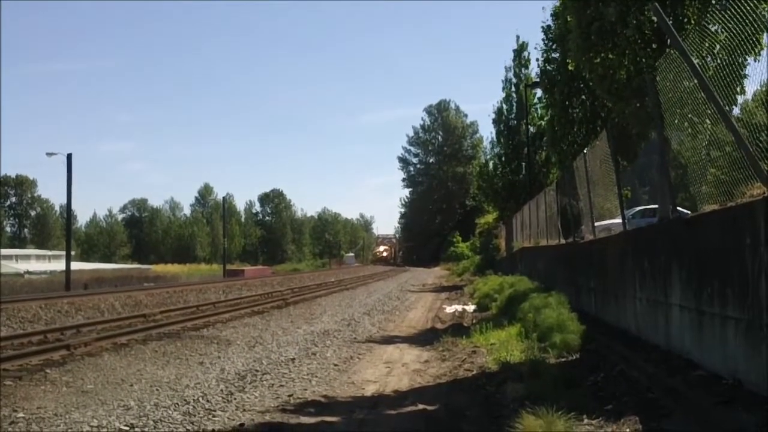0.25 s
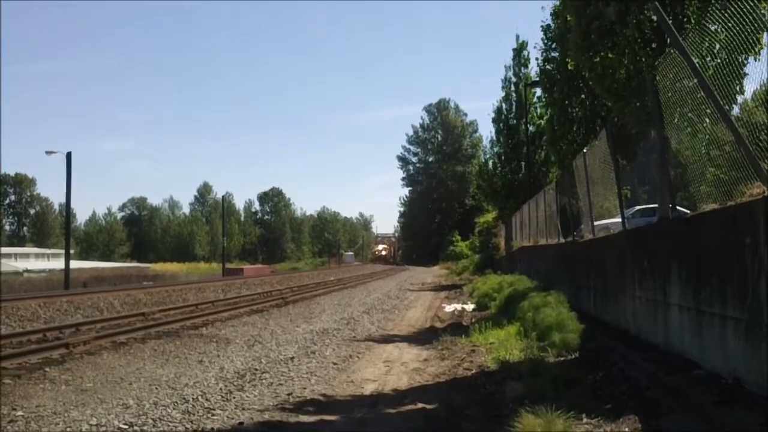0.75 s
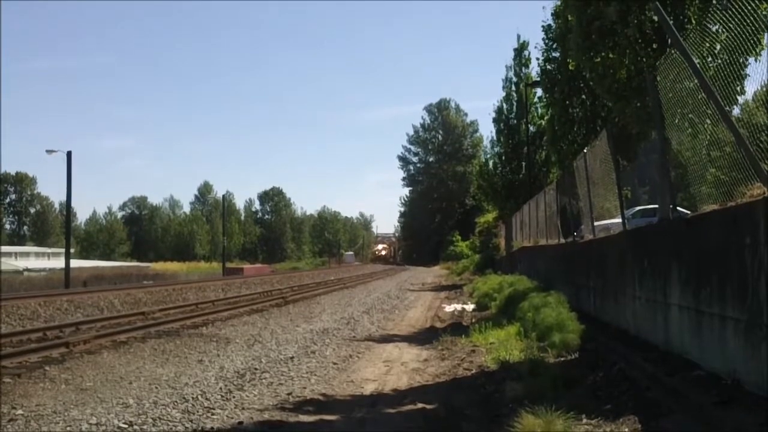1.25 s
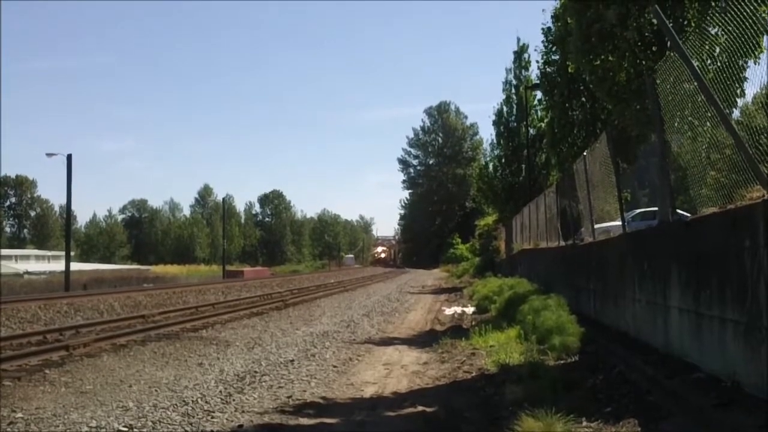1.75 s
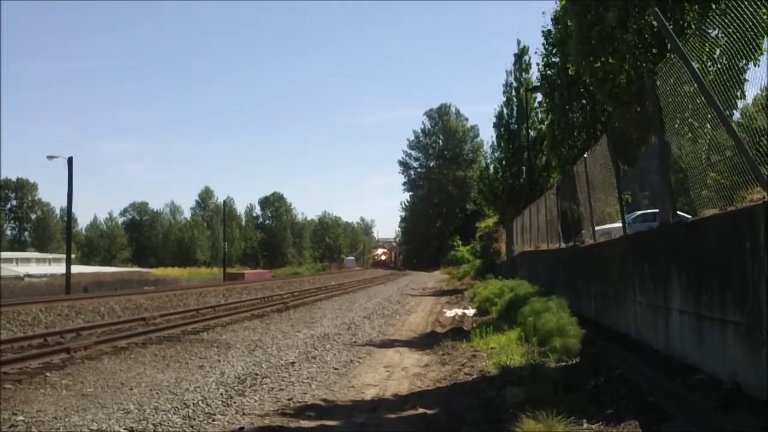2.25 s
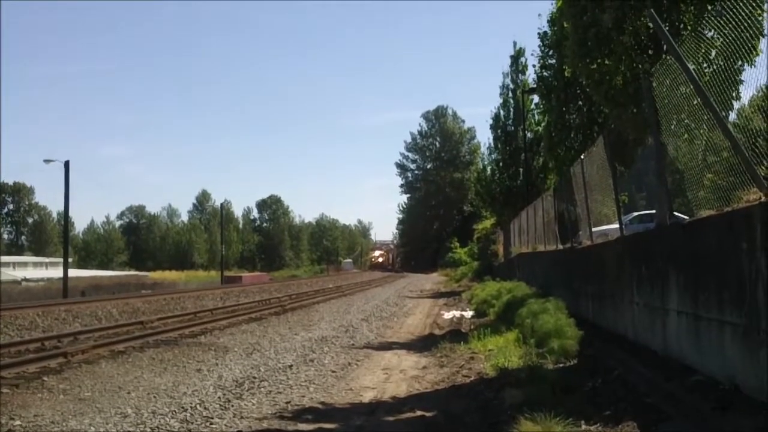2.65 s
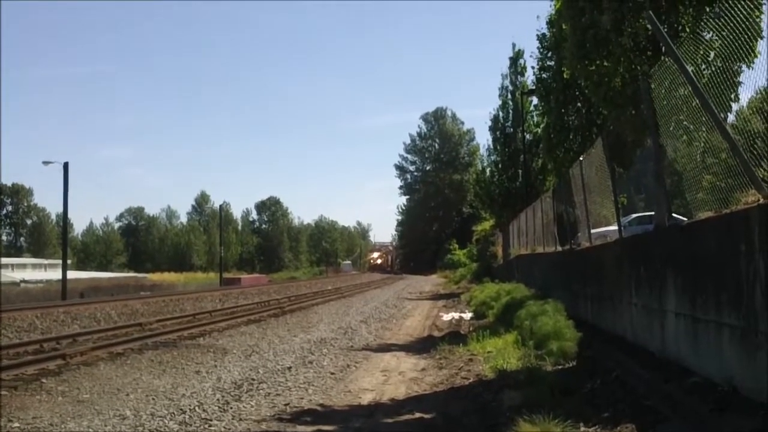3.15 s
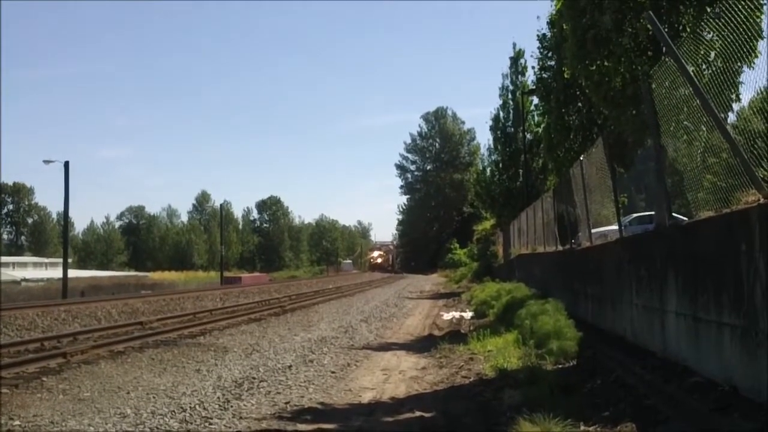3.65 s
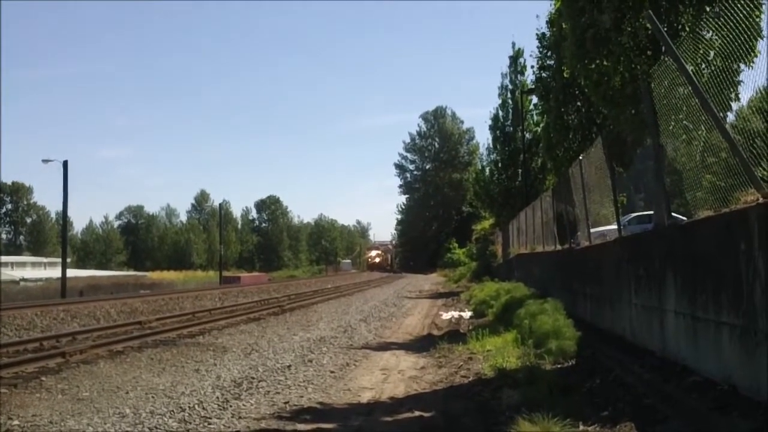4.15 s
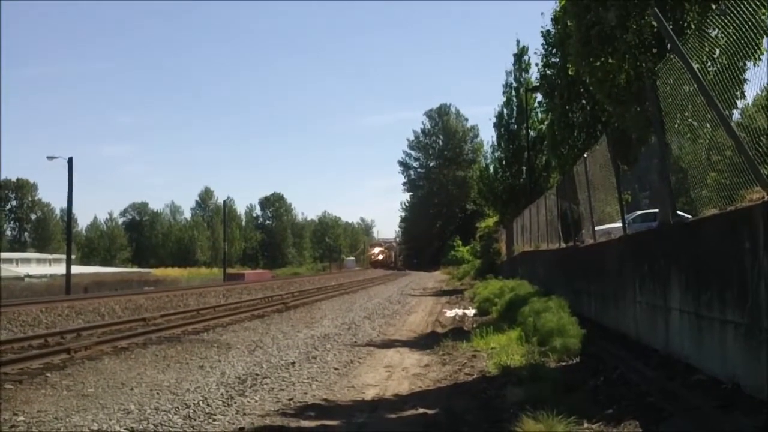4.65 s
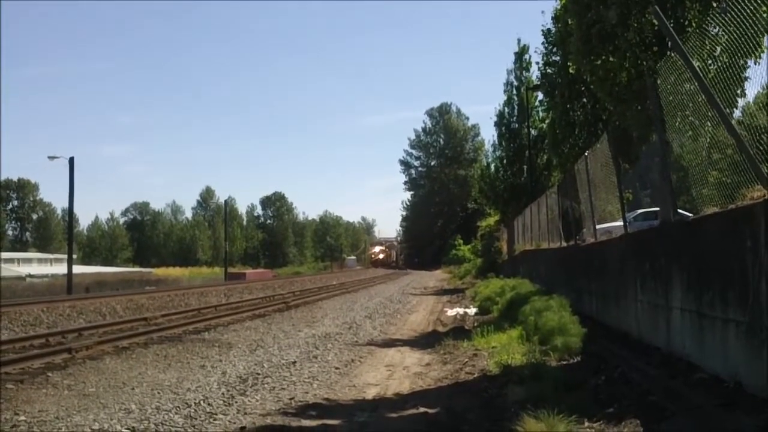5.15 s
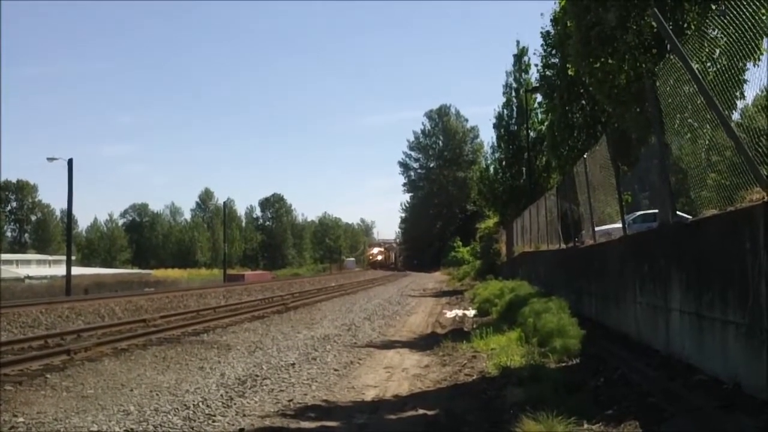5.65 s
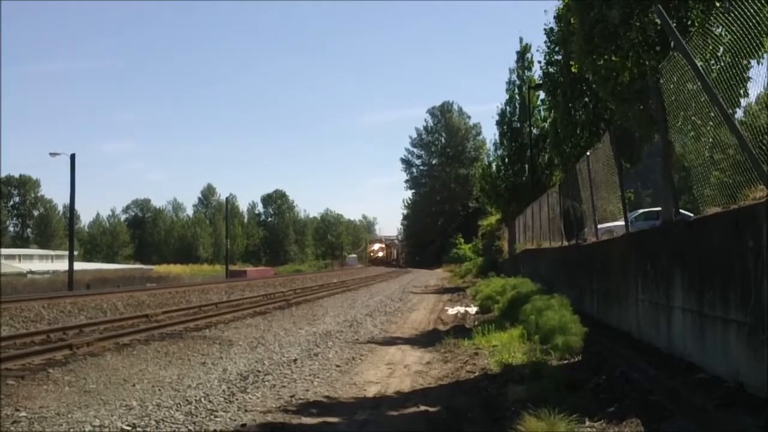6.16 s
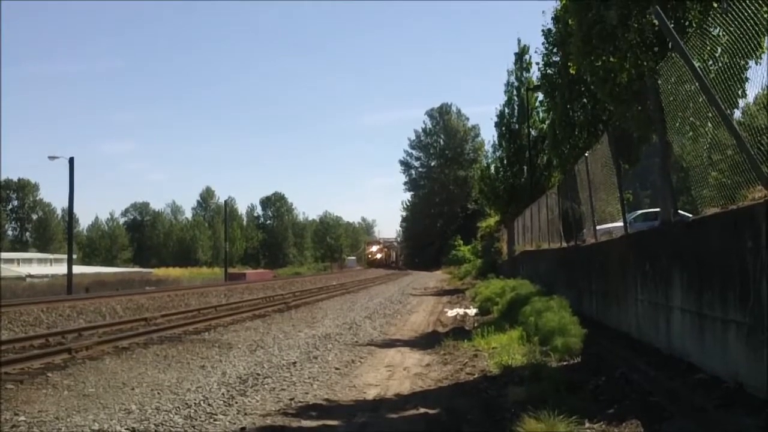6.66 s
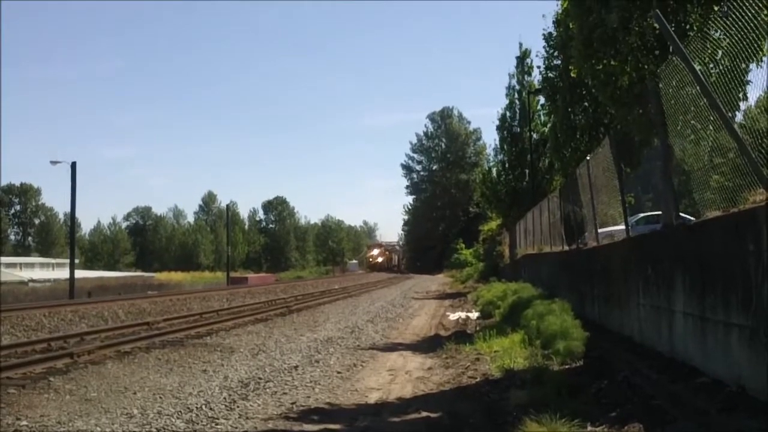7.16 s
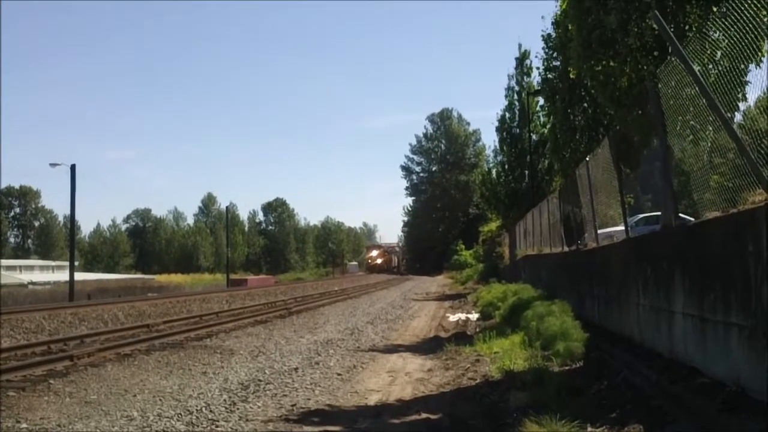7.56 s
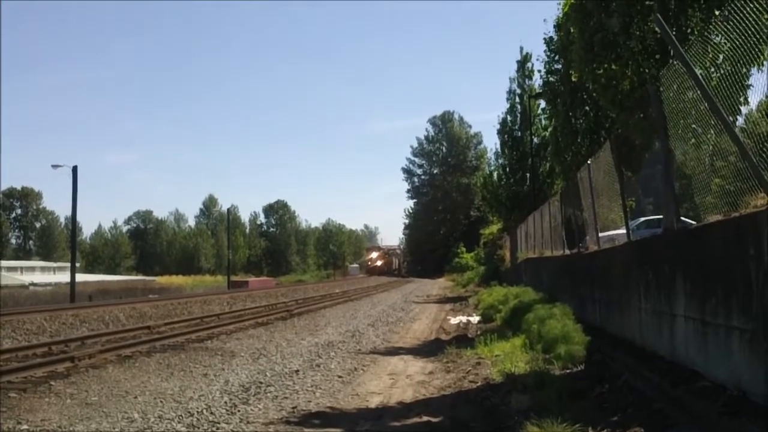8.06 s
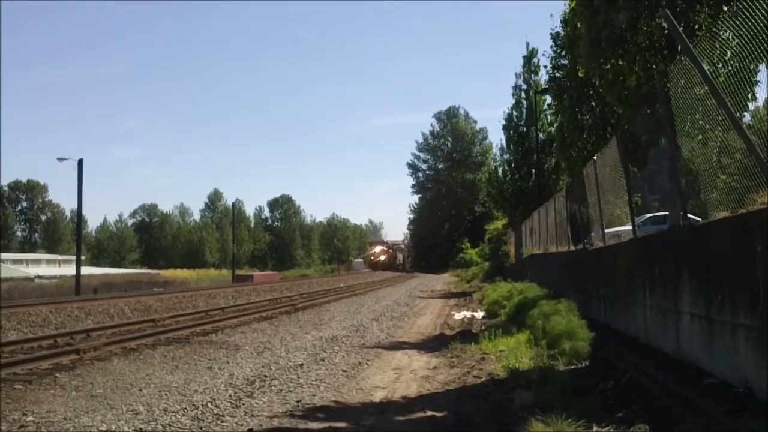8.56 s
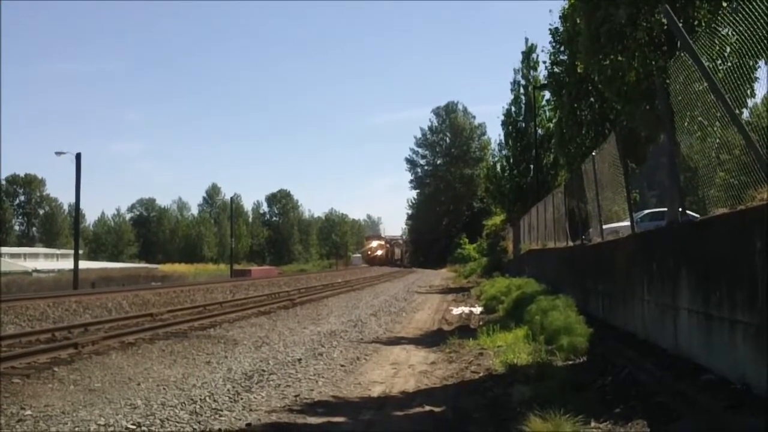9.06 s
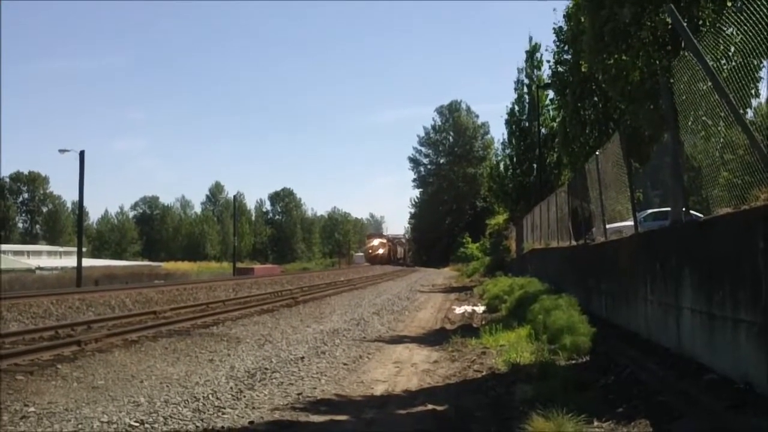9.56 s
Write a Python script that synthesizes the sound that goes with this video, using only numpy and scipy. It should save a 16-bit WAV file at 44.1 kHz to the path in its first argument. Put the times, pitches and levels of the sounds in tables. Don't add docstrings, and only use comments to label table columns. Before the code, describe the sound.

A small stereo recorder by the track picks up a diesel locomotive revving up as it draws nearer. Its bass hum starts subdued, dips early, then swells and rises, backed by another engine. Airy chuffing hiss and faint clatter build gradually. Light gusts rumble, a quiet drone sits left, one tiny bird chirp passes, then snatches of high turbo whistle and faint gear whines. The train never passes.

```python
import sys
import numpy as np
from scipy import signal
from scipy.fft import rfft, irfft, next_fast_len
from scipy.io import wavfile

SR = 44100
rng = np.random.default_rng(int(sys.argv[2]) if len(sys.argv) > 2 else 0)


def natural_amplitude(level_db):
    exponent = np.asarray(level_db, float) / 20
    return 10 ** exponent


def to_wav(s):
    ch = np.atleast_2d(s).T
    pcm = np.round(np.clip(ch, -1, 1) * 32767)
    wavfile.write(sys.argv[1], SR, pcm.astype(np.int16))


N = 433062
STEP = 20

# (time [s], level [dB])
NEAR_DB = [(0, -61.5), (.5, -59.5), (2.2, -58), (3.7, -55.5), (5, -51), (6, -49.5), (6.4, -51),
           (7.6, -49.5), (8.7, -47.5), (9.1, -50), (9.82, -49.5)]


def seconds():
    return np.arange(N) / SR


def rms_one(x):
    return x / np.sqrt(np.mean(x ** 2) + 1e-20)


def in_time(rows):
    s, *columns = np.transpose(rows)
    return [np.interp(seconds(), s, c) for c in columns]


def at_hz(points, hz):
    point_hz, point_db = np.transpose(points)
    return np.interp(np.log(hz), np.log(point_hz), point_db)


def drift(rate_hz, step=1):
    block = 40
    pole = np.exp(-2 * np.pi * rate_hz * block / SR)
    noise = rng.standard_normal(N // block + 2002)
    slow = signal.lfilter([1], [1, -2 * pole, pole * pole], noise)[2000:]
    return np.interp(np.arange(0, N, step) / block, np.arange(len(slow)), rms_one(slow - slow.mean()))


def bursts(rows, edge_s):
    t = seconds()
    gain = 0
    for s, length_s, db in rows:
        gain = gain + natural_amplitude(db) * np.clip(np.minimum(t - s, s + length_s - t) / edge_s, 0, 1)
    return gain


def coloured(spectrum, patchy_db):
    # (frequency [Hz], correlation [1])
    likeness = [(40, 0.97), (110, 0.77), (250, 0.76), (500, 0.58), (1000, 0.28), (2000, 0.8), (4300, 0.93),
                (8000, 0.87), (15000, 0.55)]
    low_hz, high_hz = spectrum[0][0], spectrum[-1][0]
    size = next_fast_len(N, True)
    hz = np.maximum(np.fft.rfftfreq(size, 1 / SR), 1)
    inside = (hz > low_hz) & (hz < high_hz)
    alike = np.clip(at_hz(likeness, hz), 0, 1)
    mid, side = rfft(rng.standard_normal((2, size))) * natural_amplitude(at_hz(spectrum, hz)) * inside
    both = np.sqrt(1 + alike) * mid + np.sqrt(1 - alike) * side * [[1], [-1]]
    out, together = 0, drift(7.5)
    for centre_hz in low_hz * 2. ** np.arange(1 + np.ceil(np.log2(high_hz / low_hz))):
        share = np.clip(1 - abs(np.log2(hz / centre_hz)), 0, 1)
        flicker = natural_amplitude(patchy_db * (0.37 * together + drift(8)))
        out = out + flicker * irfft(both * share, size)[:, :N]
    return rms_one(out)


def whistle(hz, gain, wobble_hz):
    phase = 2 * np.pi * np.cumsum(hz + wobble_hz * drift(23.5)) / SR
    return np.sqrt(2) * gain * natural_amplitude(2.1 * drift(35)) * np.sin(phase)


def gliding(row, wobble_hz):
    s, hz, glide_hz_per_s, level_db, swell_db_per_s = row
    since_s = seconds() - s
    gain = np.clip(since_s / 0.17, 0, 1) * natural_amplitude(level_db + swell_db_per_s * since_s + 2.0 * drift(4.5))
    return whistle(hz + glide_hz_per_s * since_s, gain, wobble_hz)


def nearness():
    db = in_time(NEAR_DB)[0]
    return db - db.mean()


def revs():
    t = seconds()
    return 60.17 + 2.35 * t - .0193 * t ** 2


def cycle_angle(firing_hz):
    return 2 * np.pi * np.cumsum(firing_hz / 12) / SR


def order_tone(k, angle, level_db, wander_db, side_db):
    scatter = rng.uniform(0, 2 * np.pi) * (k > 18)
    lag_turns = (k == 12) / 3
    turn = k * angle + scatter + 2 * np.pi * (.07 * drift(.3, STEP) - lag_turns)
    wander = drift(0.56, STEP)
    side = natural_amplitude(side_db + 3 * wander[::-1]) * np.cos(turn)
    return np.sqrt(2) * natural_amplitude(level_db + wander_db * wander) * (np.sin(turn) + side * [[1], [-1]])


def full_rate(x):
    return signal.resample_poly(x, STEP, 1, axis=1, window=("kaiser", 10.), padtype="edge")[:, :N]


def lead_engine():
    # (time [s], level [dB], left minus right [dB])
    firing = [(0, -25.5, .5), (.9, -25, 1.5), (1.45, -32, 3.5), (1.9, -37, 0), (2.45, -25.7, 1.5),
              (3, -22, 3.5), (3.7, -22, 2), (4.3, -21.3, -4.5), (4.9, -16.5, 0), (5.9, -13.8, 2.5),
              (6.5, -17, 4), (6.9, -18.9, -1), (7.4, -16.6, 1), (7.9, -17.5, 2), (8.4, -17.6, -1),
              (9.82, -17.4, 1.5)]
    # (order [1], level [dB], gain as the revs rise [dB])
    orders = [(5, -45.6, -6), (6, -32.2, 9), (7, -55, 1), (8, -48.5, -1), (9, -37, 21), (11, -36, 10),
              (13, -32.5, 2), (14, -33.8, 0), (16, -38.5, -9), (17, -38.3, 1), (18, -33.4, 0),
              (19, -46.5, 1), (20, -41.5, 8), (21, -37.5, 1), (22, -47.5, -2), (23, -43.5, -1),
              (24, -46, 17), (25, -48.0, 16), (26, -43.5, 4), (27, -44.8, -2), (28, -49, 4),
              (29, -57.7, -3), (30, -54, 3), (31, -53.3, -4), (32, -51.5, 2), (33, -48, -1), (34, -49.5, 0),
              (35, -58.0, -2), (36, -54, -9), (37, -56, 0)]
    # (frequency [Hz], gain [dB])
    path = [(25, -7.6), (45, -2.5), (60, -5.0), (80, 0.8), (100, -3.6), (120, -1.4), (140, 2.2), (160, 3.4),
            (175, 3.2), (190, 9.1), (205, 5.0), (220, 0.4), (240, -1.6), (300, -2.3)]
    # (time [s], half width [s], loss [dB])
    fades = [
        (1.7, .4, 6.5),
        (6.4, .3, 4.5),
        (7.4, .35, 5),
        (9.7, .4, 2),
    ]
    t, firing_hz, angle = seconds()[::STEP], revs()[::STEP], cycle_angle(revs())[::STEP]
    firing_db, lean_db = (c[::STEP] for c in in_time(firing))
    fade_db = sum(loss_db * np.exp(-((t - s) / width_s) ** 2) for s, width_s, loss_db in fades)
    progress = np.linspace(-.5, .5, len(t))

    out = order_tone(12, angle, firing_db, wander_db=.1, side_db=-18)
    out += order_tone(15, angle, -23.8 - fade_db, wander_db=.1, side_db=-20)
    out *= natural_amplitude([lean_db / 2, -lean_db / 2])

    upper = [(k, -60 - .6 * (k - 38) + 3 * (k % 3 == 0), 0) for k in range(38, 45)]
    load_db = -5 * np.exp(-t / .9)
    for k, level_db, gained_db in orders + upper:
        path_db = at_hz(path, k * firing_hz / 12)
        path_db = path_db + (k <= 20) * (2.0 - .8 * fade_db) + load_db * (12 < k < 30)
        out += order_tone(k, angle, level_db + gained_db * progress + path_db, wander_db=1.6, side_db=-20)
    return full_rate(out)


def trail_engine():
    # (time [s], firing rate [Hz], level [dB])
    running = [(0, 48.95, -31.9), (1, 51.65, -28.6), (1.5, 52.6, -32.3), (2.46, 55.1, -28),
               (3.44, 59.4, -33), (4, 61.8, -30.5), (4.9, 64.4, -29), (6.4, 65.6, -29.6), (7.3, 66, -34.5),
               (8.7, 65.5, -26), (9.82, 66.6, -25.5)]
    # (order [1], relative level [dB])
    trail_orders = [
        (12, -2.5),
        (18, -18),
        (24, -24),
    ]
    firing_hz, level_db = in_time(running)
    angle = cycle_angle(firing_hz)[::STEP]
    level_db = level_db[::STEP]
    tones = [order_tone(k, angle, level_db + db, wander_db=0.8, side_db=-21.5) for k, db in trail_orders]
    return full_rate(sum(tones))


def train_noise():
    # (frequency [Hz], density [dB per Hz]); the rumble lies between the orders
    rumble_hz = [(25, -15), (45, -12.5), (65, -3), (100, -1), (150, -6.5), (200, -6.5), (235, -15.5),
                 (260, -31.5)]
    roar_hz = [(190, -21.5), (235, -5.5), (270, 1.5), (310, -1.5), (345, -1.5), (390, -6.5), (440, -12),
               (520, -16), (600, -19.5), (700, -43)]
    low_hiss_hz = [(280, -33), (480, -6), (510, -5), (553, -5.5), (650, -1.5), (744, -3), (948, -4.5),
                   (1030, -5.5), (1140, -5.5), (1600, -9.5), (1800, -6), (2400, -23), (3120, -31.5),
                   (5280, -120)]
    high_hiss_hz = [(1500, -21.5), (2000, -2.5), (2300, -1), (2800, -2.5), (3300, -3.5), (4000, -6),
                    (4650, -4.5), (5400, -8.5), (6340, -13), (7160, -14), (7660, -18.5), (8900, -22.5),
                    (10000, -36), (12000, -58)]
    valve_gear_hz = [(2900, -24.5), (3300, -9), (3500, -0.5), (3800, -0.5), (4100, -8.5), (4700, -10),
                     (5200, -15), (5800, -22.5)]
    high_db, near_db, angle = in_time(NEAR_DB)[0], nearness(), cycle_angle(revs())
    roar_db, low_db = -48 + 0.42 * near_db, -48 + 0.41 * near_db
    chuff_db = np.cos(angle - .2) + 0.95 * np.cos(3 * angle - .5)
    rumble = natural_amplitude(-41 + .3 * near_db) * coloured(rumble_hz, patchy_db=1.0)
    roar = natural_amplitude(roar_db + 0.97) * coloured(roar_hz, patchy_db=1.5)
    low = natural_amplitude(low_db + 0.43 * chuff_db) * coloured(low_hiss_hz, patchy_db=.5)
    high = natural_amplitude(high_db + 0.65 + .6 * chuff_db) * coloured(high_hiss_hz, patchy_db=.5)
    clatter_db = 0.6 * high_db - 29 + 1.9 * chuff_db + 1.2 * drift(22)
    clatter = natural_amplitude(clatter_db) * coloured(valve_gear_hz, patchy_db=1.2)
    return rumble + roar + low + high + clatter


def wind():
    # (time [s], length [s], level [dB])
    gusts = [
        (.55, .35, -43),
        (1.15, .9, -47),
        (2.7, .75, -35),
        (3.5, .9, -42),
        (5.65, .6, -35),
        (6.3, .7, -38),
        (7.1, .35, -41),
        (7.5, .7, -38),
        (8.7, .5, -39),
        (9.45, .3, -44),
    ]
    port = signal.butter(3, [5, 44], "band", fs=SR, output="sos")
    shared, left, right = signal.sosfilt(port, rng.standard_normal((3, N)))
    lumps = natural_amplitude(2.5 * np.array([drift(5), drift(4)]))
    gain = natural_amplitude(7) * (natural_amplitude(-49) + bursts(gusts, edge_s=.12))
    return gain * rms_one(lumps * (0.58 * shared + np.array([left, right])))


def recorder_whine():
    # (harmonic [1], right level [dB])
    clock_a = [(1, -72), (2, -71), (3, -71), (4, -72), (5, -71), (6, -72), (7, -72.5), (8, -73)]
    # (frequency [Hz], right level [dB])
    clock_b = [(3999.8, -69.5), (5999.8, -75), (7999.7, -78), (9999.6, -77.5)]
    # (frequency [Hz], density [dB per Hz])
    self_noise = [(3000, 9.5), (8000, -20), (10000, 0.5), (11200, -8), (12200, 0), (12900, -11.5),
                  (13800, -0.5), (14500, -8.5), (15100, 0), (15250, -4.5)]
    # (time [s], level [dB])
    top_tone = [(0, -67), (4.7, -61.5), (5.9, -63), (6.3, -67), (9.82, -70.5)]
    # (time [s], length [s], depth [dB])
    dropouts = [(.77, .17, -1), (1.63, .22, 0), (2.41, .09, -1), (4.83, .21, 0), (5.65, .08, -1),
                (6.34, .2, -3), (7.12, .44, -3), (8.14, .06, -1), (8.99, .05, 0), (9.57, .3, -.5)]
    t = seconds()
    buzz = 1 + .45 * np.cos(2 * np.pi * 53.6 * t + 1.6 * drift(2.5))
    comb = sum(natural_amplitude(db) * np.sin(2 * np.pi * k * 1733.26 * t + k * k) for k, db in clock_a)
    other = sum(natural_amplitude(db) * np.sin(2 * np.pi * hz * t) for hz, db in clock_b)
    tones = buzz * comb * natural_amplitude([[-8], [0]]) + other * natural_amplitude([[-4.5], [0]])
    hiss = natural_amplitude(-70.5) * coloured(self_noise, patchy_db=0.5)
    on = np.clip(1 - bursts(dropouts, edge_s=.015), .03, 1)
    top = on * natural_amplitude(in_time(top_tone)[0] + 2.5 * drift(30)) * np.sin(2 * np.pi * 14999.4 * t)
    fade = np.sqrt(2) * natural_amplitude(-.35 * nearness())
    return fade * (tones + hiss) + top * natural_amplitude([[-8], [0]])


def side_drone():
    # (start [s], frequency [Hz], glide [Hz/s], level [dB], swell [dB/s])
    fan = (1.5, 196.5, -.4, -48, .3)
    return gliding(fan, wobble_hz=2.62) * natural_amplitude([[3], [-6]])


def chirps():
    # (time [s], length [s], start [Hz], end [Hz], level [dB])
    notes_sung = [
        (2.505, .07, 4480, 4720, -55),
        (2.57, .1, 4500, 4650, -63),
        (2.11, .07, 14100, 13600, -68),
    ]
    out, t = np.zeros(N), seconds()
    for s, length_s, start_hz, end_hz, level_db in notes_sung:
        u = np.clip((t - s) / length_s, 0, 1)
        hz = start_hz + (end_hz - start_hz) * u + 130 * drift(150)
        out += natural_amplitude(level_db) * np.sin(np.pi * u) * np.sin(2 * np.pi * np.cumsum(hz) / SR)
    return out


def gear_whines():
    # (start [s], frequency [Hz], glide [Hz/s], level [dB], swell [dB/s])
    whines = [
        (6.7, 880, 25, -63, 1),
        (4.8, 643, 5, -65, .8),
        (3, 1174, 0, -66, .5),
        (6.5, 520, 0, -65, 1),
    ]
    return sum(gliding(row, wobble_hz=7) for row in whines)


def turbo():
    # (time [s], length [s], level [dB])
    snatches = [
        (3.81, .1, -66),
        (4.01, .24, -64.5),
        (4.6, .14, -60),
        (4.84, .32, -61.5),
        (5.18, .18, -56),
        (5.39, .14, -62),
        (9.15, .7, -66),
    ]
    hz = 4690 - 400 * np.exp(-np.maximum(seconds() - 3.85, -1) / 1.4)
    return whistle(hz, bursts(snatches, edge_s=.02), wobble_hz=8)


def scene():
    train = lead_engine() + trail_engine() + train_noise() * natural_amplitude([[.1], [-.1]])
    thin = chirps() + gear_whines() + turbo() * natural_amplitude([[-1.5], [1.5]])
    return train + wind() + side_drone() + thin


def roll_off(x):
    return signal.sosfilt(signal.butter(12, 15280, fs=SR, output="sos"), x)


def record(dry):
    mix = dry + recorder_whine()
    return roll_off(mix)


dry = scene()
out = record(dry)
to_wav(out)
```